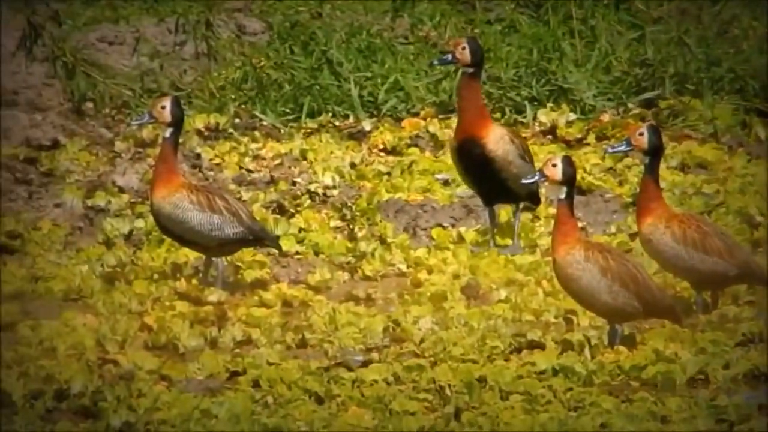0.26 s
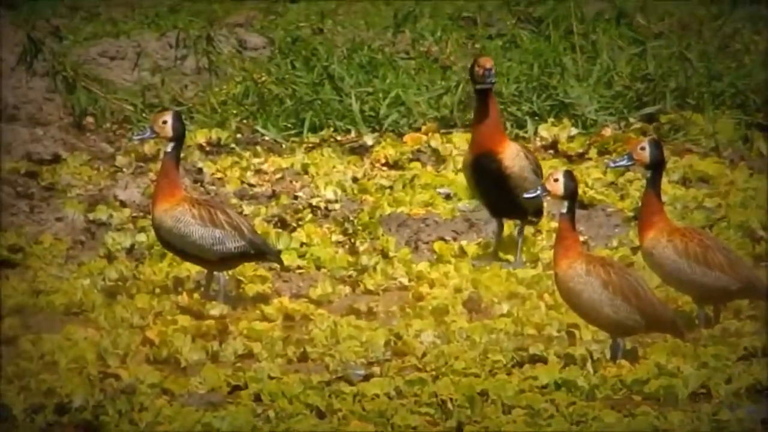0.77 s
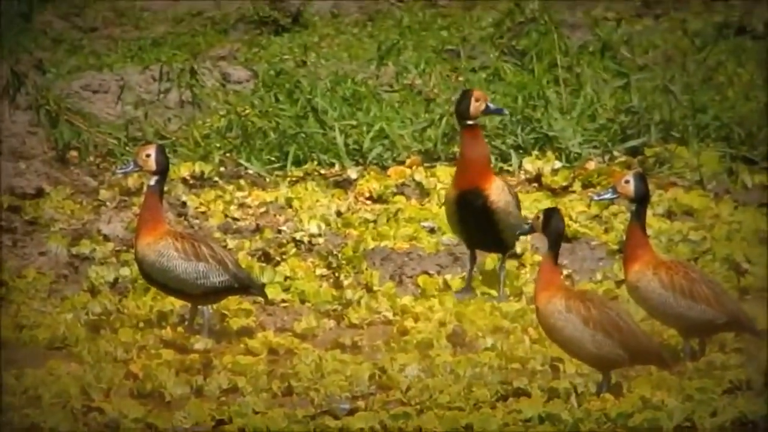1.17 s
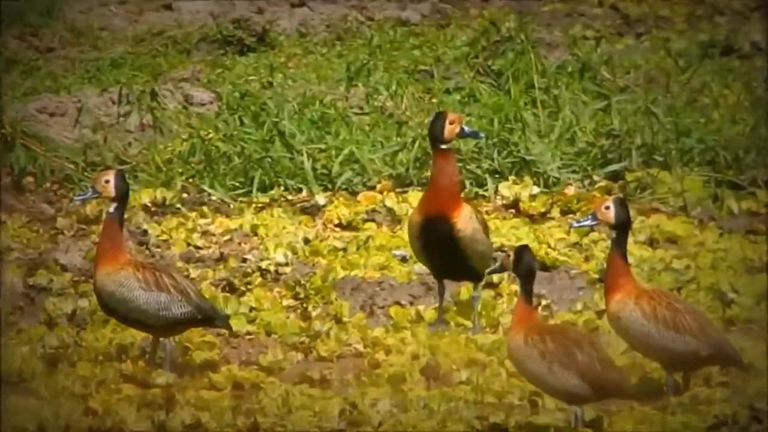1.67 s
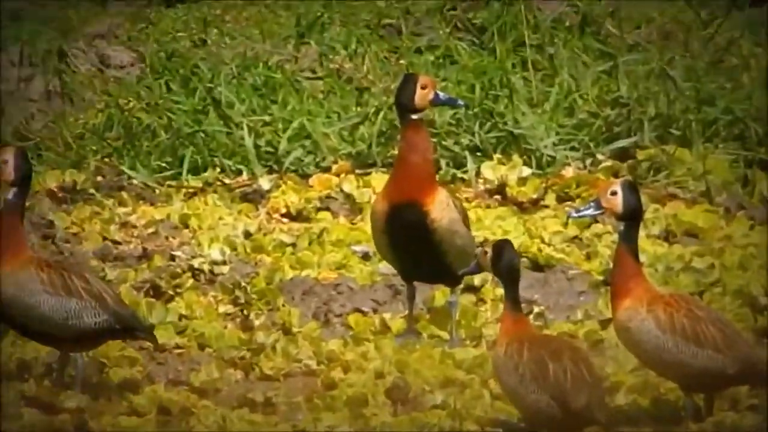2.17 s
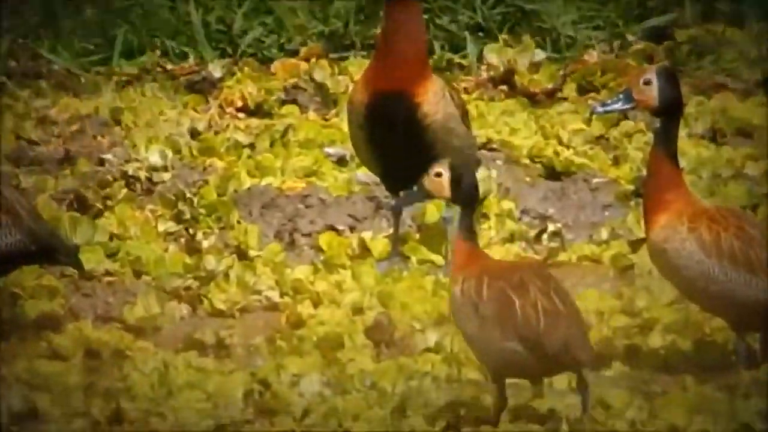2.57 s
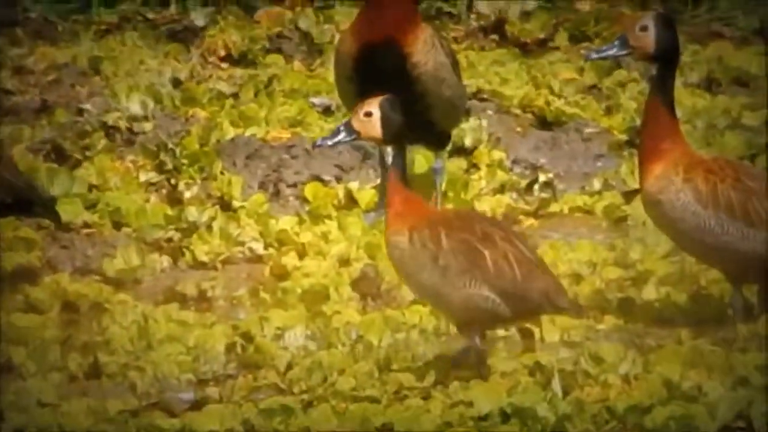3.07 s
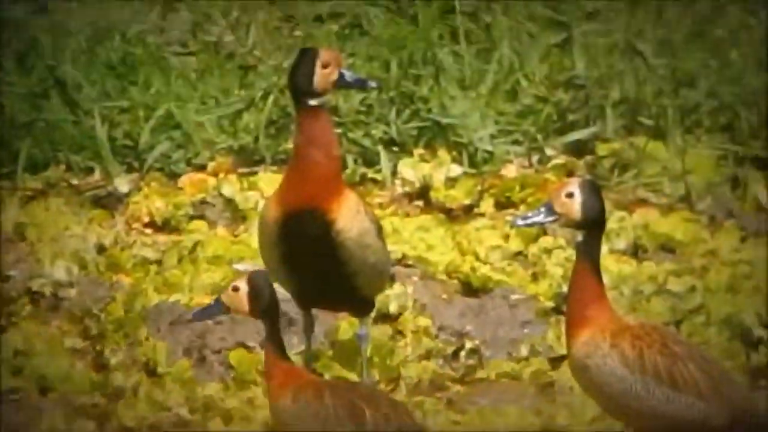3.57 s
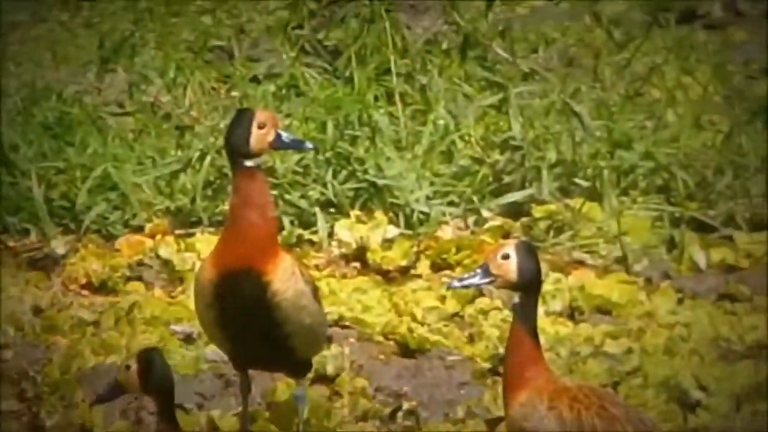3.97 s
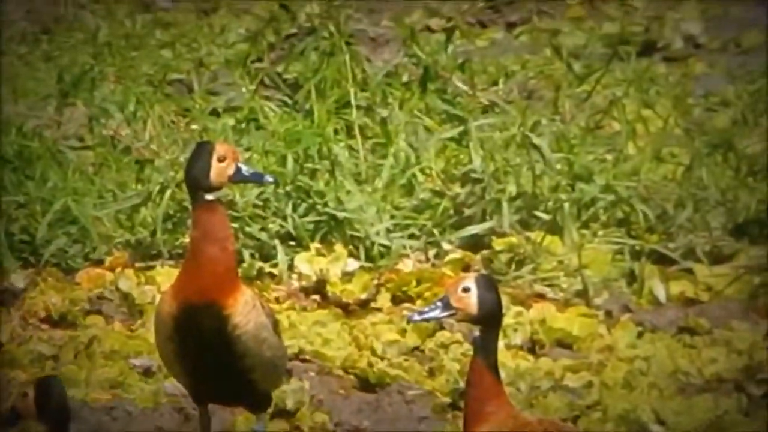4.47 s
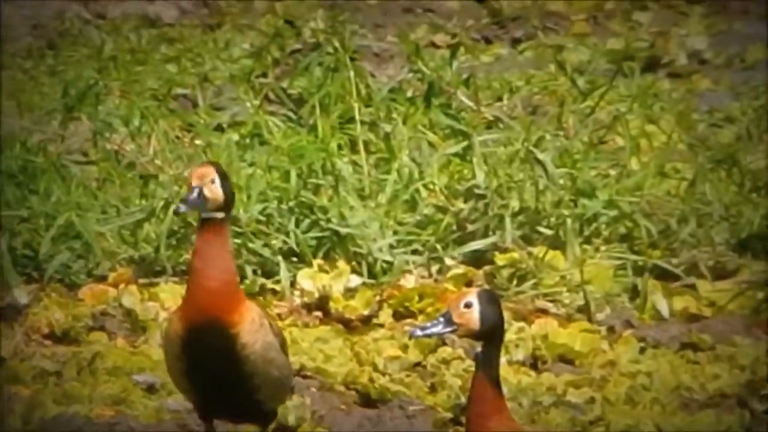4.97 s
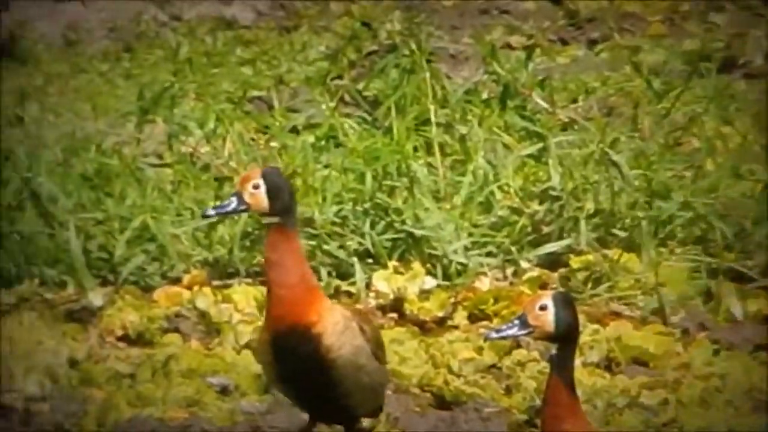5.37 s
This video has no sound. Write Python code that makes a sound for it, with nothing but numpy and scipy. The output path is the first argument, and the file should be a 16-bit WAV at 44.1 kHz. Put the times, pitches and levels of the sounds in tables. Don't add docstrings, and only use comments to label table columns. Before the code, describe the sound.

A quiet open-air wetland with soft broadband air noise, thin high insect hiss, and low wind buffeting, stronger on the right and fading late. From about 0.3 s a duck, some way off and slightly right, utters short reedy notes: first a hurried, uneven cluster of muffled nasal pips, then from 0.7 s a regular run, roughly six per second, each climbing quickly and often dropping into a brief low croak. From about 1.3 s the tone brightens as the bill opens; from 2.0 to 2.8 s the notes are fuller arches, rising and falling, slightly slower. Three steadier, bright notes follow at 3.0, 3.3 and 3.5 s, with croaky endings, and after a pause three softer, gaping arched calls at 4.2, 4.3 and 4.6 s. A light diffuse echo trails the calls. Faint hollow booms and short low grunts sound far away, the last boom from about 5 s with no more calling.

```python
import sys
import numpy as np
from scipy import signal
from scipy.fft import rfft, irfft, next_fast_len
from scipy.io import wavfile

SR = 44100
rng = np.random.default_rng(int(sys.argv[2]) if len(sys.argv) > 2 else 0)


def waveform_to_disk(signal):
    frames = np.transpose(np.atleast_2d(signal))
    scaled = np.clip(frames, -1, 1) * 32767
    samples = np.round(scaled).astype(np.int16)
    wavfile.write(sys.argv[1], SR, samples)


def gain_from_decibels(decibels):
    exponent = np.asarray(decibels, float) / 20
    return 10 ** exponent


N = 248283

# [f/Hz, level/dB per Hz]
AIR_SPECTRUM = [(35, -38), (60, -5.5), (101, -8), (150, -6.5), (382, -8.5), (617, -12), (723, -10.5),
                (1930, -17), (6780, -19.5), (14100, -25.5)]
AIR_DB = -55
# [f/Hz, left-right likeness]
AIR_LIKENESS = [(60, 0.68), (180, 0.37), (530, 0.46), (1560, 0.13), (4610, 0.0233), (13600, 0.027)]
# [t/s, peak level/dB]
GUSTS = [(0, -48.5), (.45, -49), (.7, -50.5), (0.971, -48.5), (1.14, -52.5), (1.49, -48), (1.74, -54.5),
         (2.57, -49), (2.77, -57), (3.0, -55), (3.16, -52), (3.93, -57), (4.63, -64), (5.5, -73)]
GUST_SLOPE_DB_PER_S, CALM_DB = 107, -67
# [f/Hz, width/Hz, level/dB]
INSECTS = [
    (6540, 1000, -63.5),
    (8440, 1300, -63),
]
# [t/s, length/s, f/Hz, level/dB]
BOOMS = [
    (0.104, 0.74, 150, -70.5),
    (1.301, .75, 157.2, -65.5),
    (3.948, .5, 144.5, -66),
    (4.582, 0.267, 156, -61.5),
    (4.951, 1, 149, -68.5),
]
BOOM_SAG_HZ_PER_S, BOOM_WAVER_DB = 8, -0.5
# [t/s, peak level/dB, f/Hz]
GRUNTS = [
    (1.829, -57, 214),
    (1.957, -49, 195),
    (2.201, -54.5, 193),
    (2.301, -59, 184.1),
    (2.835, -50.5, 209),
    (4.65, -50.5, 186),
    (4.743, -53, 178),
    (5.101, -58, 236.5),
]
BANKS_T60_S, BANKS_DB = 0.91, -9.5
LEFT_LAG_S, LEFT_DB = 6.6e-5, -2.5
PORT_PHASE_LIMIT = 2.77

CHEST_HZ, CHEST_WIDTH_HZ = 690, 460
NASAL_HZ, NASAL_WIDTH_HZ = 1290, 280
BILL_WIDTH_HZ, UPPER_WIDTH_HZ = 570, 680
# [f/Hz, width/Hz, level/dB re upper]
SHEEN = [
    (4900, 2400, -17),
    (5640, 390, -16.5),
    (7370, 1600, -19.5),
    (8935, 200, -15),
]
GAPE_SHEEN_DB = 5.5
FULL_VOICE_HZ, WEAK_VOICE_DB = 586, -9
SLACK_CHEST_DB = -25
DWELL_FROM, DWELL_SPAN = 0.201, 0.53

OPENING = [0, .3, .5, .7, .8, 1, 1.2]
START_HZ = [550, 597, 448, 440, 448, 430, 490]
NASAL_DB = [8, 6.5, 3, -1, -4, -7, 4.5]
BILL_HZ = [2020, 1915, 1770, 2080, 2405, 2243, 2316]
BILL_DB = [-12, -7.5, -3.5, 9.5, 11, 7, 8]
UPPER_HZ = [2650, 2580, 2620, 2450, 3700, 3530, 3890]
UPPER_DB = [-20, -14.5, -12, -8, 2, 9, 8]

# [t/s, rise/s, top f/Hz, level/dB, opening]
CUT_NOTES = [(.28, 0.0203, 757, -48.5, .03), (.394, 0.017, 716, -45, 0.021), (.474, 0.0097, 619, -48, .01),
             (.707, 0.0175, 650, -46, .01), (.849, 0.0274, 684, -46, 0.189), (1.001, .0344, 707, -46, 0.26),
             (1.158, 0.038, 710, -45.5, 0.304), (1.319, 0.026, 719, -44.5, 0.51),
             (1.482, 0.0267, 721, -45, 0.54), (1.638, 0.029, 699, -46.5, 0.57),
             (1.804, 0.032, 692, -44, 0.63), (3.636, 0.02, 665, -52, 1), (3.643, 0.0056, 550, -47, .99)]
CUT_FALL_S, CUT_END = 0.00568, .98
# [t/s, fall/s, top f/Hz, level/dB, opening]
DROOPED_NOTES = [
    (.364, 0.0245, 653, -48, .03),
]
DROOP_RISE_S, DROOP_END = 0.0123, 0.61
# [t/s, fall/s, top f/Hz, level/dB, opening]
HELD_NOTES = [
    (3.016, 0.026, 658.5, -44, 1.01),
    (3.315, 0.017, 652, -44, 1),
    (3.532, 0.016, 660.4, -44, 1.01),
]
HELD_RISE_S, HELD_END = .027, 1.048
# [t/s, fall/s, top f/Hz, level/dB, opening]
ARCHED_NOTES = [
    (1.972, 0.0351, 686.6, -44, 0.69),
    (2.164, 0.033, 673.6, -44, 0.78),
    (2.364, 0.044, 675, -44, .95),
    (2.555, 0.0465, 675.3, -43.5, 0.98),
    (2.76, 0.053, 664, -45, 1),
    (4.166, .036, 630.4, -48, 1.19),
    (4.334, 0.038, 646.6, -47, 1.09),
    (4.562, 0.046, 655.6, -46.5, 1.07),
]
ARCH_RISE_S, ARCH_END_HZ = .032, 322
# [t/s, rise/s, top f/Hz, level/dB, nasal level/dB]
LEAD_INS = [
    (0.271, 0.0123, 504, -49.5, -1),
    (.562, 0.0156, 550, -52, 19.5),
    (.686, 0.019, 523, -50, 15),
    (.839, 0.013, 526, -47.5, 11),
    (0.994, 0.0081, 510, -50, 10),
    (1.153, 0.0094, 507, -51.5, 15),
    (3.617, 0.021, 440, -47, -20),
]
LEAD_START_HZ, LEAD_FALL_S = 423, 0.0045
LEAD_BILL_HZ, LEAD_BILL_DB = 1560, -9
# [f/Hz, level/dB]
LEAD_UPPER = (2500, -22)
# [t/s, fall/s, top f/Hz, level/dB, nasal level/dB]
CROAKS = [(0.31, 0.011, 657, -41.5, 5.5), (.487, .0109, 490, -41, 9), (0.579, 0.0209, 544, -48.5, 20.5),
          (.731, 0.0039, 537, -38.5, 19.5), (.883, 0.014, 604, -44.5, 15.5), (1.042, 0.0088, 487, -38, 13),
          (1.204, 0.016, 460, -43.5, 10), (1.369, 0.0088, 430, -40, -3), (1.531, 0.0095, 434, -39.5, 3),
          (1.688, 0.012, 435, -42, 4), (1.852, .0088, 518, -39, -2.5), (3.086, 0.016, 430, -48.5, -16.5),
          (3.384, 0.017, 430, -46, -15.5), (3.693, 0.025, 397, -50.5, -22)]
CROAK_RISE_S, CROAK_END = .0027, 0.613
# [bill f/Hz, bill level/dB, upper f/Hz, upper level/dB]
CROAK_TRACT = (1750, -12, 2700, -26)


def rms_one(x):
    return x / np.sqrt(np.mean(x ** 2) + 1e-20)


def at_hz(points, hz):
    table = np.array(points)
    return np.interp(np.log(hz), np.log(table[:, 0]), table[:, 1])


def wander(rate, size):
    r = np.exp(-2 * np.pi * rate / SR)
    slow = signal.lfilter([1], [1, -2 * r, r * r], rng.standard_normal(size + 8000))
    return rms_one(slow[4000:])[4000:]


def band(x, low_hz, high_hz):
    sos = signal.butter(2, [low_hz, min(high_hz, .45 * SR)], "band", fs=SR, output="sos")
    return signal.sosfilt(sos, x)


def air(patchy_db):
    out = 0
    edges = 50 * 2 ** np.arange(0, 8.4, 1 / 3)
    white = rng.standard_normal((2, 2, N))
    for k, (low, high) in enumerate(zip(edges, edges[1:])):
        mid, side = band(white[k % 2], low, high)
        hz = np.sqrt(low * high)
        alike = np.clip(at_hz(AIR_LIKENESS, hz), -1, 1)
        gain = gain_from_decibels(at_hz(AIR_SPECTRUM, hz) + patchy_db * wander(9, size=N))
        out = out + gain * (np.sqrt(1 + alike) * mid + np.sqrt(1 - alike) * side * [[1], [-1]])
    return gain_from_decibels(AIR_DB) * rms_one(out)


def wind():
    t = np.arange(N) / SR
    gust_power = sum(gain_from_decibels(db - GUST_SLOPE_DB_PER_S * np.abs(t - s)) ** 2 for s, db in GUSTS)
    gust = np.sqrt(gain_from_decibels(CALM_DB) ** 2 + gust_power)
    rumble = rms_one(band(rng.standard_normal((2, N)), 14.5, 49.8))
    return rumble * gust * gain_from_decibels(0.5 * wander(27, size=N)) * gain_from_decibels(np.array([[-9.0], [5.5]]))


def insects():
    out = 0
    for hz, width_hz, db in INSECTS:
        hiss = rms_one(band(rng.standard_normal((2, N)), hz - width_hz / 2, hz + width_hz / 2))
        out = out + hiss * gain_from_decibels(db + 1.4 * wander(29.0, size=N) + 0.38 * wander(60, size=N))
    return out * gain_from_decibels(np.array([[-3.0], [2.0]]))


def booming():
    t, out = np.arange(N) / SR, np.zeros(N)
    waver = gain_from_decibels(BOOM_WAVER_DB * wander(5, size=N))
    for s, length, hz, db in BOOMS:
        edges = np.clip(np.minimum(t - s, s + length - t) / 0.043, 0, 1)
        pitch = hz - BOOM_SAG_HZ_PER_S * (t - s - length / 2)
        tone = np.sin(2 * np.pi * np.cumsum(pitch) / SR)
        out += edges * gain_from_decibels(db) * waver * np.sqrt(2) * tone
    for s, db, hz in GRUNTS:
        swell = np.exp(-((t - s - .02) / 0.019) ** 2)
        out += gain_from_decibels(db) * swell * np.sin(2 * np.pi * hz * (t - s))
    return out * gain_from_decibels(1.08 * wander(31, size=N))


def banks(x):
    t = np.arange(SR) / SR
    onset = np.clip((t - .004) / .008, 0, 1)
    tail = rng.standard_normal((2, SR)) * gain_from_decibels(-60 * t / BANKS_T60_S) * onset
    tail *= gain_from_decibels(3.0 * wander(25, size=SR)) * (1 + 1.5 * gain_from_decibels(-60 * t / .1))
    tail = band(band(tail, 670, 8400), 700, 7800) + 0.98 * band(tail, 560, 734)
    tail /= np.sqrt(np.sum(tail[0] ** 2))
    return signal.fftconvolve(x[None], tail, axes=1)[:, :N]


def resonance(hz, centre_hz, width_hz, db):
    return gain_from_decibels(db) ** 2 / (1 + (2 * (hz - centre_hz) / width_hz) ** 2) ** 2


def tract_power(hz, weak, bright_db, voice):
    nasal_db, bill_hz, bill_db, upper_hz, upper_db = voice
    power = resonance(hz, CHEST_HZ, CHEST_WIDTH_HZ, SLACK_CHEST_DB * weak)
    power += resonance(hz, NASAL_HZ, NASAL_WIDTH_HZ, nasal_db)
    power += weak * resonance(hz, 884, 930, 4.3)
    power += resonance(hz, bill_hz, BILL_WIDTH_HZ, bill_db + 0.35 * bright_db)
    power += resonance(hz, upper_hz, UPPER_WIDTH_HZ, upper_db + bright_db)
    for centre_hz, width_hz, db in SHEEN:
        gape_db = GAPE_SHEEN_DB * (centre_hz > 6000) * (upper_hz > 3630)
        power += resonance(hz, centre_hz, width_hz, upper_db + db + bright_db + gape_db)
    return power


def note(shape, voice):
    start, rise, fall, start_hz, top_hz, end_hz = shape
    level_db, *tract = voice
    t = np.arange(int((rise + fall) * SR)) / SR - rise

    if start_hz > 555 and rise > .02:
        step = np.clip((np.abs(t / rise) - DWELL_FROM) / DWELL_SPAN, 0, 1)
        below = step * step * (3 - 2 * step)
    else:
        bend = np.clip(.6 + 170 * fall, 1, 2.15)
        below = np.abs(t / rise) ** bend
    climb = top_hz - (top_hz - start_hz) * below
    descent = top_hz - (top_hz - end_hz) * np.abs(t / fall) ** 2.0
    pitch = np.where(t < 0, climb, descent)

    weak = 1 / (1 + np.exp((pitch - FULL_VOICE_HZ) / 11))
    hoarse = weak * np.where((t < 0) & (rise > .013), .3, 1)
    pitch = pitch * (1 + (.006 + .03 * hoarse) * wander(250, size=len(t)))
    phase = 2 * np.pi * np.cumsum(pitch) / SR
    bright_db = -8 * weak * (t < 0) - 200 * np.maximum(t + 0.00133, 0)

    out = 0
    for k in range(1, 17):
        power = tract_power(k * pitch, weak, bright_db, tract)
        flutter = 1 + (.15 + .5 * hoarse) * wander(160, size=len(t))
        flutter += (.08 + .0035 * k * k + .2 * (k > 6)) * wander(500, size=len(t))
        out = out - np.sqrt(power) * flutter * np.cos(k * phase - .2 * k * k)

    swell = np.clip((t + rise) / (.25 * rise + .002), 0, 1)
    fade = np.clip((fall - t) / min(.008, .5 * fall + .003), 0, 1)
    tiring_db = -120 * np.maximum(t, 0)
    tiring_db -= 6.5 * (rise < .0045)
    weak_db = WEAK_VOICE_DB * weak * np.where(t < 0, 1, .85)
    return out * swell * fade * gain_from_decibels(level_db + weak_db + tiring_db) * np.sqrt(2)


def opened(start, rise, fall, top_hz, end_hz, level_db, opening):
    laws = (START_HZ, NASAL_DB, BILL_HZ, BILL_DB, UPPER_HZ, UPPER_DB)
    start_hz, *tract = (np.interp(opening, OPENING, law) for law in laws)
    return (start, rise, fall, start_hz, top_hz, end_hz), (level_db, *tract)


def bird():
    notes = []
    for s, rise, hz, db, opening in CUT_NOTES:
        notes.append(opened(s, rise, CUT_FALL_S, hz, CUT_END * hz, db, opening))
    for s, fall, hz, db, opening in DROOPED_NOTES:
        notes.append(opened(s, DROOP_RISE_S, fall, hz, DROOP_END * hz, db, opening))
    for s, fall, hz, db, opening in HELD_NOTES:
        notes.append(opened(s, HELD_RISE_S, fall, hz, HELD_END * hz, db, opening))
    for s, fall, hz, db, opening in ARCHED_NOTES:
        notes.append(opened(s, ARCH_RISE_S, fall, hz, ARCH_END_HZ, db, opening))
    for s, rise, hz, db, nasal_db in LEAD_INS:
        shape = (s, rise, LEAD_FALL_S, LEAD_START_HZ, hz, hz)
        notes.append((shape, (db, nasal_db, LEAD_BILL_HZ, nasal_db + LEAD_BILL_DB, *LEAD_UPPER)))
    for s, fall, hz, db, nasal_db in CROAKS:
        shape = (s, CROAK_RISE_S, fall, hz, hz, CROAK_END * hz)
        notes.append((shape, (db, nasal_db, *CROAK_TRACT)))

    out = np.zeros(N)
    for shape, voice in notes:
        one = note(shape, voice)
        at = round(shape[0] * SR)
        out[at:at + len(one)] += one
    return out


def at_ports(voice):
    size = next_fast_len(N)
    lag_phase = 2 * np.pi * np.fft.rfftfreq(size, 1 / SR) * LEFT_LAG_S
    phase = PORT_PHASE_LIMIT * np.tanh(lag_phase / PORT_PHASE_LIMIT)
    late = irfft(rfft(voice, size) * np.exp(-1j * phase), size)[:N]
    return gain_from_decibels(4.0) * np.array([gain_from_decibels(LEFT_DB) * late, voice])


def scene():
    voice = bird()
    background = air(patchy_db=1.47) + wind() + insects() + booming()
    return background + gain_from_decibels(BANKS_DB) * banks(voice) + at_ports(voice)


def top_cut(x):
    return signal.sosfilt(signal.butter(12, 14240, fs=SR, output="sos"), x)


def record(dry):
    low_pass = signal.ellip(12, .3, 50, 14120, fs=SR, output="sos")
    return top_cut(signal.sosfilt(low_pass, dry))


dry = scene()
out = record(dry)
waveform_to_disk(out)
```